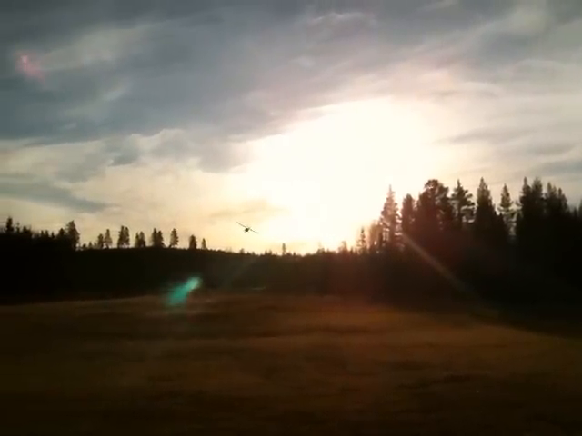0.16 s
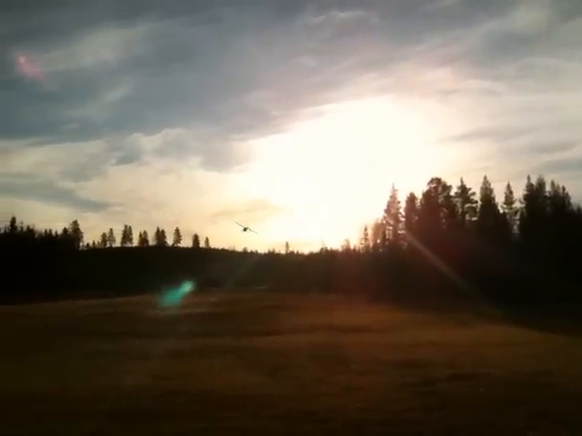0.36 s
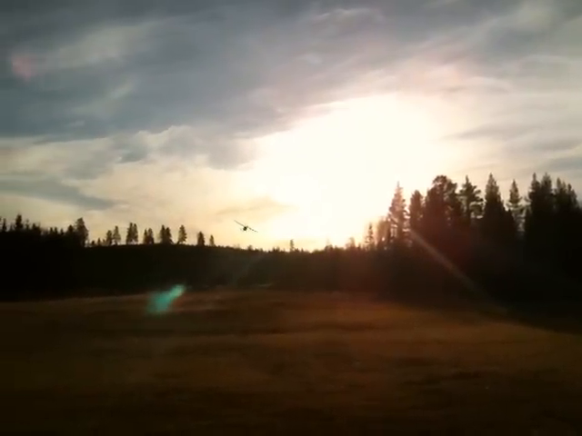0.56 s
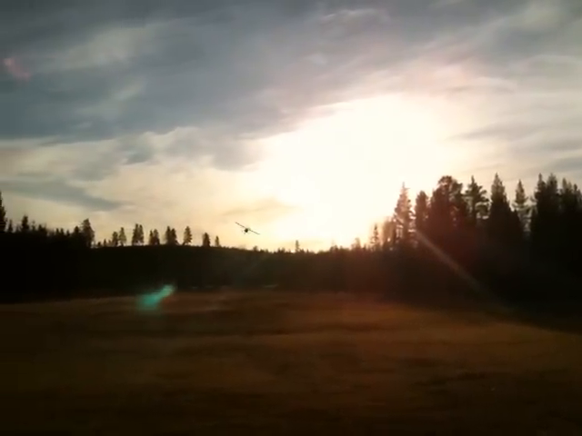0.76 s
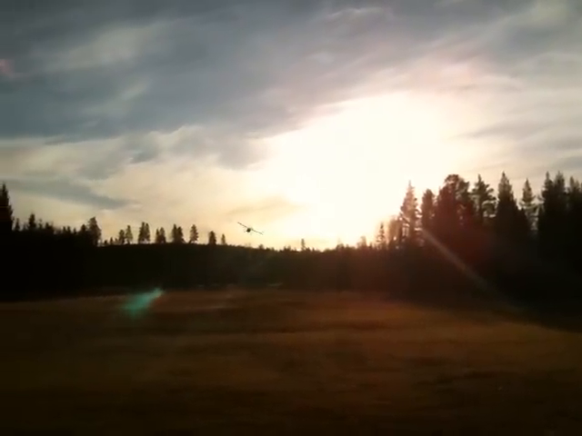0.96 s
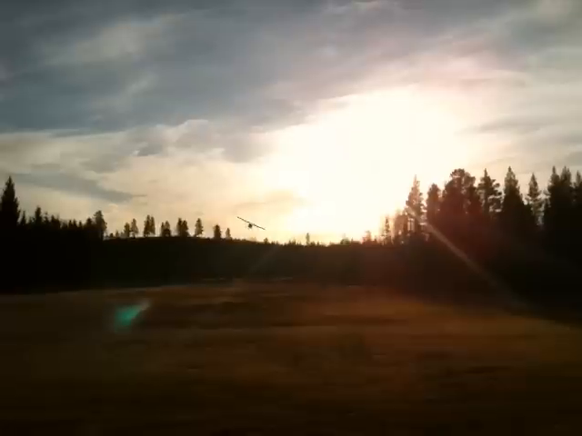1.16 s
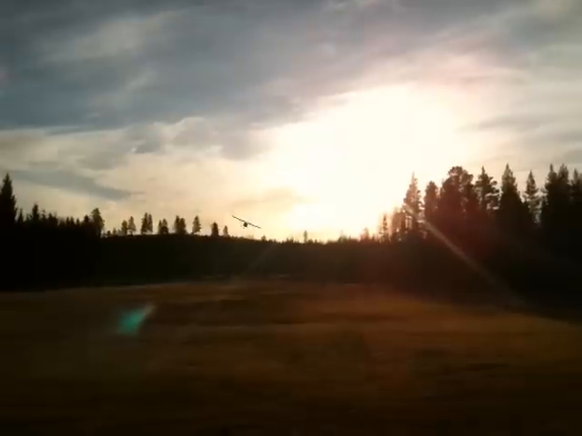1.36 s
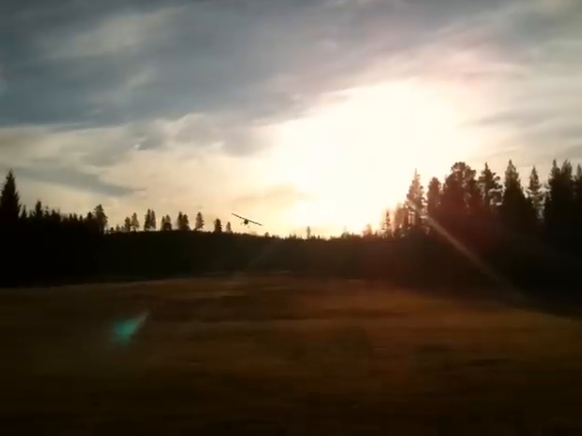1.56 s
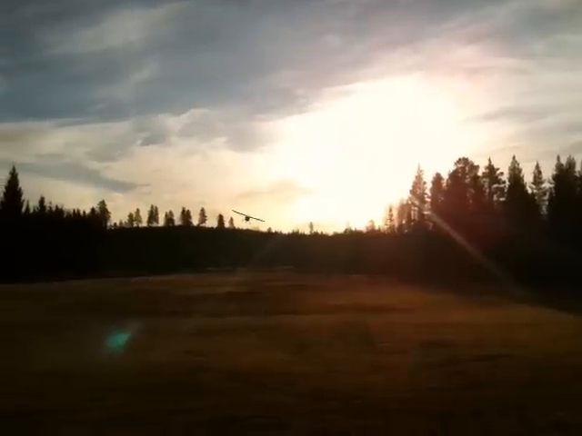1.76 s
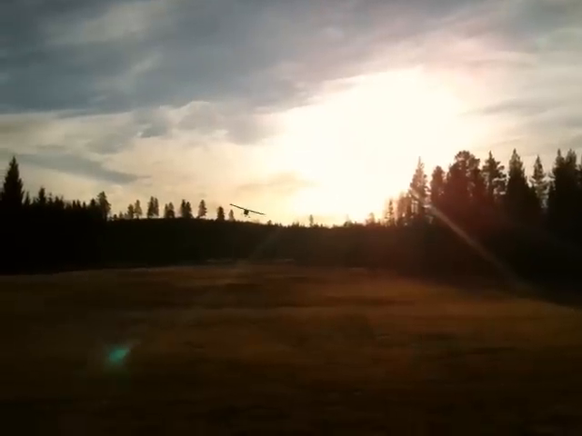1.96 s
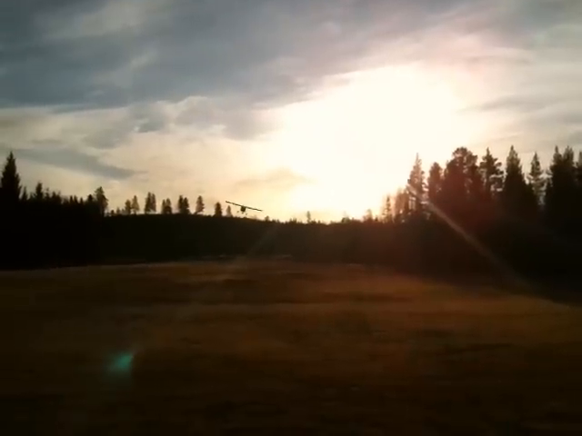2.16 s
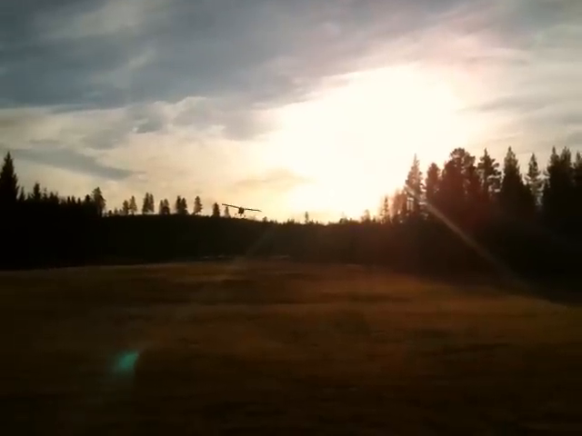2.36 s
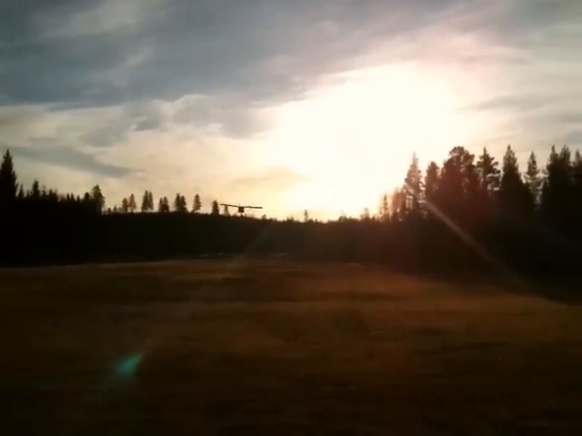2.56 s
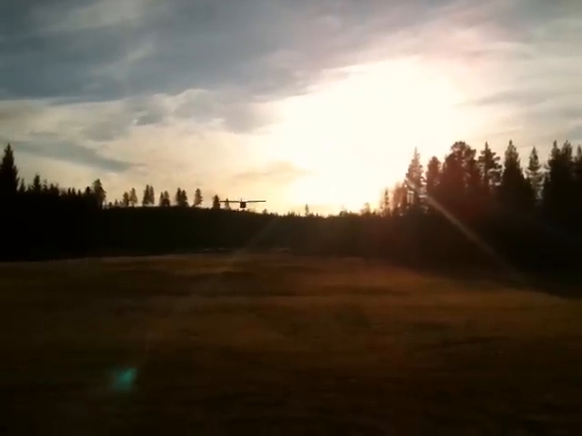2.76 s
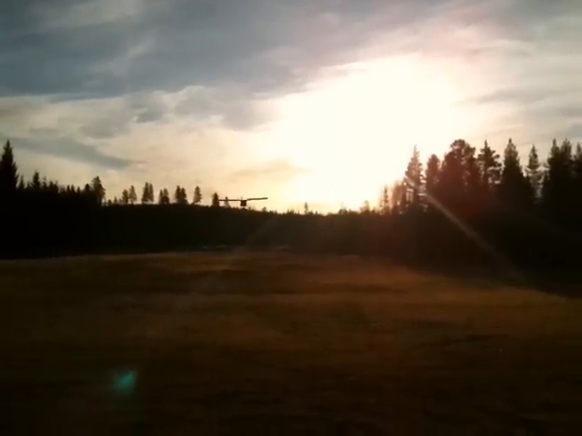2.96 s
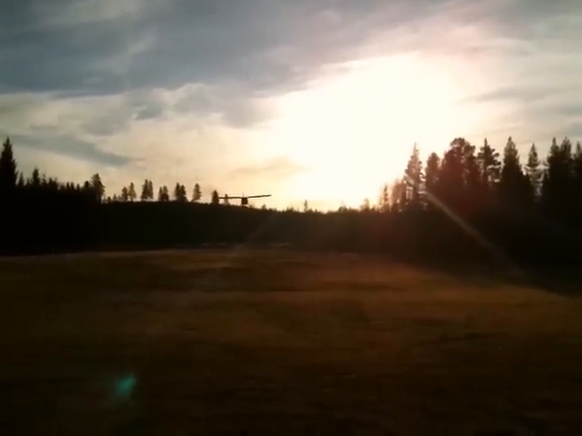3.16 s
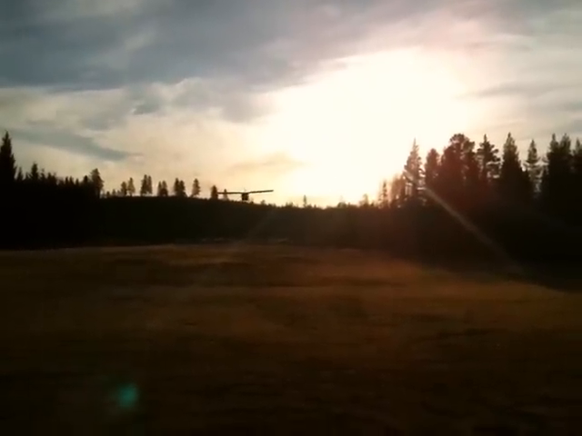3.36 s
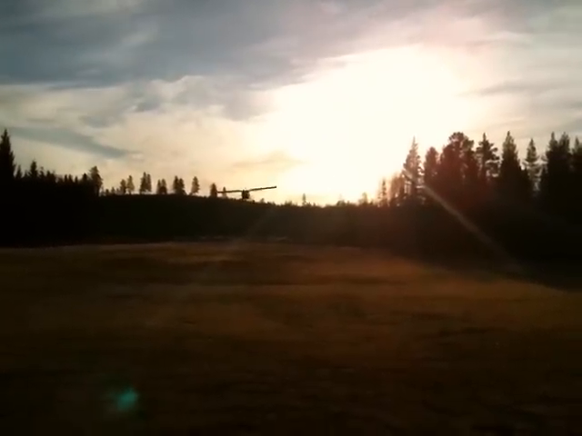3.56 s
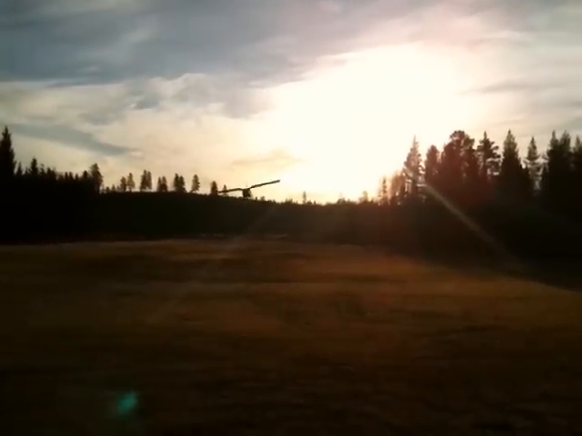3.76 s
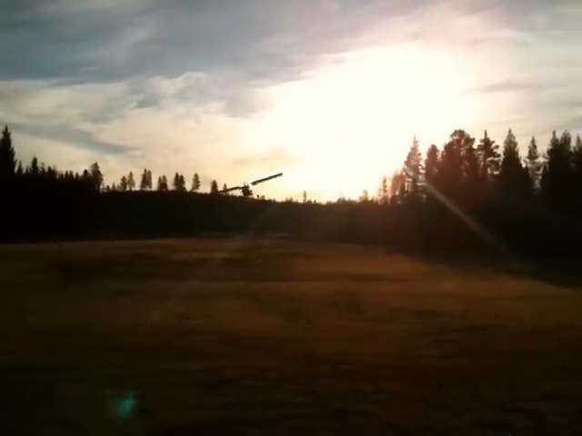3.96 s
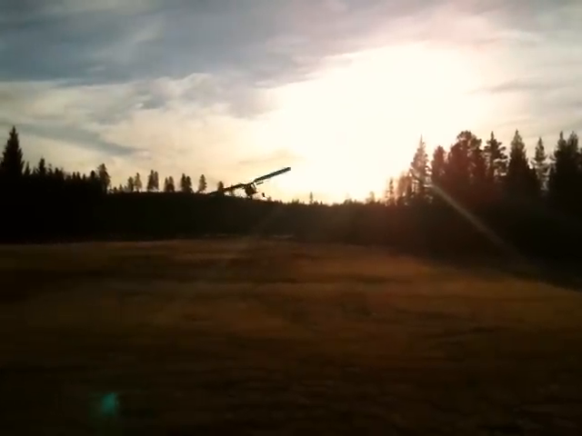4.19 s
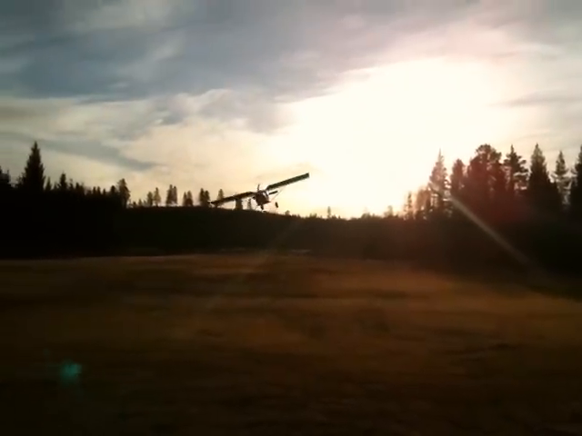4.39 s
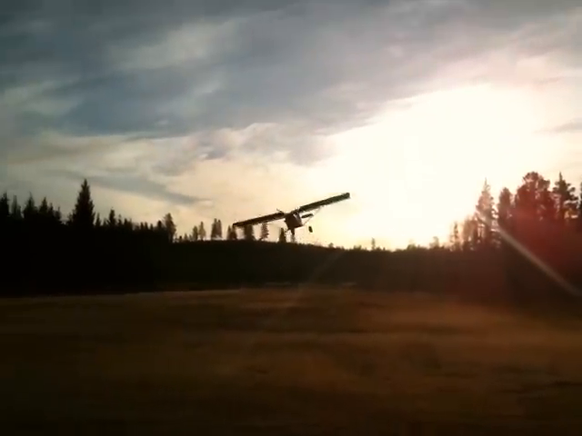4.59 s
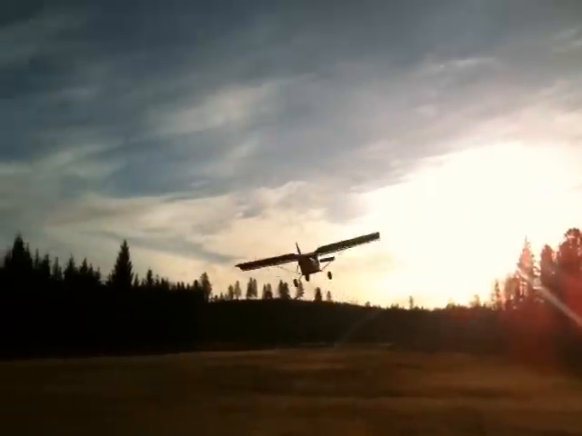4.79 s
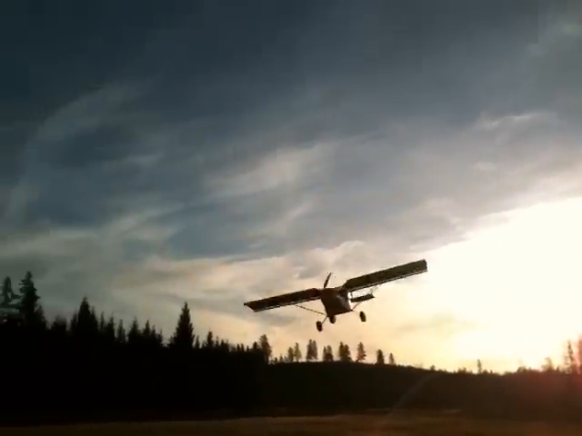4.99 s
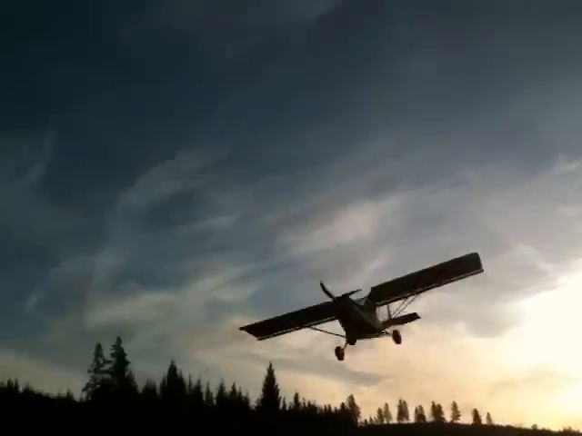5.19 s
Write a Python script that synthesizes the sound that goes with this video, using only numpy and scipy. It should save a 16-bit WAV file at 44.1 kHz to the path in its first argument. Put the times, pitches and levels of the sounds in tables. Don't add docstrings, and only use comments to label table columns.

```python
import sys
import numpy as np
from scipy import signal
from scipy.fft import rfft, irfft
from scipy.io import wavfile
from scipy.ndimage import uniform_filter1d

SR = 44100
rng = np.random.default_rng(int(sys.argv[2]) if len(sys.argv) > 2 else 0)


def ratio(d):
    e = np.asarray(d, float) / 20
    return 10 ** e


def persist_wave(psi):
    counts = np.round(np.clip(psi, -1, 1) * 32767).astype(np.int16)
    wavfile.write(sys.argv[1], SR, np.atleast_2d(counts).T)


N = 230890
T = np.arange(N) / SR
SLOW = T[::64]

# [t/s, place in the trio, 0 to 2; above or between means a blend]
STATE = [(0, 0.24), (.7, 0.22), (1.3, 0.19), (1.7, 0.19), (2.03, 0.059), (2.14, 0.65), (2.3, 0.69),
         (2.5, 0.54), (3, 0.76), (3.5, 0.88), (4, 0.97), (4.5, 1.23), (4.65, 1.3), (4.8, 1.33), (5, 1.8),
         (5.24, 1.83)]

# [t/s, cycles per s, half the crank speed]
CYCLE = [(0, 33.2), (.5, 33.3), (.8, 33.55), (1.1, 34.3), (1.5, 35.35), (1.75, 36.5), (1.97, 37.75),
         (2.14, 39.2), (2.3, 40.55), (2.45, 41.45), (2.64, 41.85), (2.8, 42), (4.3, 42), (4.9, 41.93),
         (5.24, 41.65)]
MULTIPLES = [*range(3, 26), 33, 38, 19 / 3, 38 / 3]
FIRING = [(-20, -48, -34), (-9, -5, -6), (-2.5, -28, -31), (2.5, -8.5, -10), (-5, -9, 1), (-2.5, -37, 9),
          (-21, -32, 4), (-23, -72, -16), (-17, 2, -1), (-7.5, -12.5, -16), (-8.5, -14, -3),
          (-12, -7.5, -15), (-3.5, -7, -17.5), (-3.5, -5.5, 1.5), (-9, -12, -46), (-2, -27, 9),
          (-9, -30, -1), (-40, -4.5, 0.5), (-14, -13.5, -10), (-18, -6, -9), (-1, -8, -25), (-10, -39, 7),
          (-5, -9, -8), (-1.5, -9, -32), (-1, 0, -38), (-4, -20.5, 0.5), (-38, -14.5, 3)]
RASP = range(55, 67)
SHAKE_DB, SHAKE_RAD = 0.7, 0.032
# [f/Hz, width/Hz, level/dB]
SILENCER = [(200, 55, 0.5), (478, 29, -3), (564, 42, -4.5), (624.6, 18, 4.5), (644, 30, -6),
            (894, 70, -2.5), (1340, 340, -17.5)]
# [t/s, f/Hz, level/dB, length/s]
COUGHS = [
    (2.619, 200, -35, 0.054),
    (2.783, 653, -59, 0.017),
]

SMALL_TEETH, LARGE_TEETH, BLADE_COUNT, CYLINDERS = 21, 51, 3, 4
BLADES = [(-1, -4.5, 1.5), (0.5, 7.5, 10.7), (15.5, -2, 8.7), (0, -4, 8.4)]
MESH = [(-6, -47, -4.5), (-11.5, -14.5, 0), (-10.5, -6.5, -15), (-8.5, -11, -4), (-18, -12, 1),
        (-22, -7.5, -8.5), (-28, -16, -2.5)]
OCTAVE = [(-24, -22, -28), (-17, -8, -28), (-24, -24, -28)]
# [width/Hz, trio of level/dB]
RATTLE = [(300, (-5.5, -31, -29)), (306, (-22, -7, -7)), (200, (-23, -17, -27))]
# [t/s, level/dB]
LOAD = [(0, 4), (2, -0.5), (2.6, 0), (3.1, 2.5), (3.6, 1.5), (4.0, 1), (4.3, -0.5), (4.5, -4), (4.62, 2),
        (4.72, 4), (4.9, 0.5), (5.05, -3), (5.24, -1.5)]

# [f/Hz, level/dB per Hz]
ROAR = [(40, -107), (150, -4.5), (330, -12), (480, -3.5), (930, -10), (1800, -15.5), (2600, -10.5),
        (3200, -15.5), (3800, -14.5), (4400, -15), (5000, -16), (8000, -21.5), (10000, -29.5),
        (10800, -31.5), (11500, -37), (15700, -36)]
SWELL_DB = 0.25
# [low f/Hz, high f/Hz, trio of level/dB]
TIPS = [
    (4800, 7300, (-19, -11.5, -22)),
    (10000, 15600, (-51, -47, -25)),
]
# [f/Hz, width/Hz, level/dB against the pass level]
STRUTS = [(4280, 150, -19), (4595, 200, -18.5)]
# [t/s, level/dB]
FLOW = [(0, -3), (.8, 0), (1.6, 0), (2.5, -9), (2.9, 3.5), (3.4, 1.5), (3.65, 1), (4.1, 3), (4.35, 2.5),
        (4.65, 3.5), (4.85, -6), (5.24, -21)]

SPEED_M_S, PASS_S, MISS_M, CAMERA_M, SOUND_M_S = 30, 5.5, 30, 1.37, 343
# [t/s, height above the grass/m]
HEIGHT = [(0, 28), (1, 22.5), (1.6, 19.1), (2.0, 16.1), (2.5, 12.96), (3.2, 9.62), (3.7, 7.44), (4.1, 5.85),
          (4.45, 5.37), (4.7, 5.9), (4.9, 7), (5.24, 9.6)]
PASS_DB, GRAZE_DB_PER_M = -26.5, 0.083
EXHAUST_DB, PROPELLER_DB = (-5, -5, -4.5), (-21.5, -20, -24.5)
GEAR_DB, ROAR_DB = (-11.5, -11.5, -11.5), (0.2, -0.46, 0.94)
# [t/s, half length/s, level/dB, air path gained/m]
EDDIES = [(0.952, 0.83, -3, -32), (1.44, 0.062, 1, 2), (2.142, 0.059, 1.5, 4), (1.81, 0.37, -2.5, 11),
          (2.996, 0.71, 0.6, 12.5), (3.927, 0.87, -0.08, -7.5), (4.303, 0.39, 0.35, -1.5),
          (4.697, 0.18, -0.65, 2.5), (5.15, 0.14, 0.83, -3)]
MURK = 3.76
ECHO = (0.45, 0.44, 0.16)
SHADE_DB, SHADE_HZ, SHADE_S = -2.5, 4800, (4.6, 5.1)

# [f/Hz, level/dB per Hz]
HISS = [(30, -12), (150, 23), (600, 15), (3000, 3.5), (9000, -1.5), (14000, 0), (15800, -14)]
# [f/Hz, level/dB]
WHINE = [(14971, -87), (15030, -82), (15089, -108), (15149, -99)]
# [f/Hz, limit in a quiet scene/dB, rise/dB per dB of loudness]
MASK = [(3000, -135, 1.4), (6000, -117, 1.4), (8500, -106, 1.7), (10300, -103.3, 2.0),
        (10900, -101.5, 1.95), (11200, -101, 1.8), (12600, -101, 1.8), (13500, -102, 1.85),
        (14500, -101, 1.9), (14900, -102.5, 1.35), (15150, -102.5, 1.35), (15300, -102, 1.95),
        (15800, -103, 1.85)]
# [t/s, low f/Hz, high f/Hz]
SLIPS = [(.347, 4130, 6890), (.835, 6890, 8270), (.905, 4130, 5170), (4.713, 4650, 5680),
         (4.829, 4130, 5170), (4.829, 6890, 8270)]
BLOCK_S = 2048 / SR


def exhaust(rate, turns, surge_db=0.95):
    pull = ratio(surge_db * uniform_filter1d(np.gradient(rate, SLOW), size=90))
    churn = gain((1.5, 0, 6))
    out = np.zeros(N)
    for k, db in zip(MULTIPLES, FIRING):
        level = gain(db) * silencer(k * rate)
        if k % CYLINDERS == 0:
            level = level * pull
        out += tone(k * turns, level, flutter_db=SHAKE_DB * k ** 0.4, wander=SHAKE_RAD * k * churn)
    for k in RASP:
        out += tone(k * turns, gain((-31, -28, -33)), flutter_db=7.0, wander=0.19)
    return heard(EXHAUST_DB) * out


def silencer(hz):
    return np.sqrt(sum(ratio(2 * db) / (1 + (2 * (hz - f) / width) ** 2) for f, width, db in SILENCER))


def coughs():
    out = np.zeros(N)
    for s, hz, db, length in COUGHS:
        progress = np.clip((T - s) / length, 0, 1)
        swell = np.sin(np.pi * progress ** 0.45) ** 2
        out += ratio(db) * swell * np.sin(2 * np.pi * hz * T)
    return out


def roar(turns):
    throb = 1 + 0.035 * np.cos(2 * np.pi * turns) + 0.12 * np.cos(2 * np.pi * CYLINDERS * turns)
    swell = fine(ratio(-1.5 + SWELL_DB * drift(top_hz=9)))
    return heard(ROAR_DB) * swell * throb * (coloured(ROAR, patchy_db=0.94) + gusts())


def gusts(swing_db=3.0):
    out = np.zeros(N)
    for low_hz, high_hz, dbs in TIPS:
        band = signal.butter(N=2, Wn=[low_hz, high_hz], btype="band", fs=SR, output="sos")
        level = gain(dbs) * ratio(swing_db * drift(top_hz=30.57))
        out += fine(level) * evened(signal.sosfilt(band, rng.standard_normal(N)))
    return out


def gearbox(shaft):
    out = np.zeros(N)
    first = LARGE_TEETH - len(MESH) // 2
    for k, db in enumerate(MESH):
        out += tone((first + k) * shaft, gain(db), flutter_db=2.5, wander=0.72)
    for k, db in enumerate(OCTAVE):
        out += tone((2 * LARGE_TEETH + k - 1) * shaft, gain(db), flutter_db=2, wander=0.5)
    for k, (width_hz, db) in enumerate(RATTLE):
        out += fine(gain(db)) * fuzzy((k + 1) * LARGE_TEETH * shaft, width_hz)
    return heard(GEAR_DB) * fine(ratio(curve(LOAD, 1))) * out


def propeller(shaft):
    out = np.zeros(N)
    for k, db in enumerate(BLADES):
        out += tone((k + 1) * BLADE_COUNT * shaft, gain(db), flutter_db=1.2, wander=0.06)
    return heard(PROPELLER_DB) * out


def struts():
    out = np.zeros(N)
    for hz, width_hz, db in STRUTS:
        out += ratio(db) * fuzzy(hz * T, width_hz)
    return heard((0, 0, 0)) * fine(ratio(curve(FLOW, 1))) * out


def meadow(x, air_db=0.1234, steepness=1.875, lag_turns=0.6, soft_hz=800, blur_turns=3.3):
    hz, t, z = signal.stft(x, SR, nperseg=1024, noverlap=768)
    hz = hz[:, None]
    path_m = np.maximum(distance(t) - MISS_M + eddies(t, column=3), 0)
    loss_db = air_db * (hz / 1000) ** steepness * MURK * path_m / 100
    air = ratio(-loss_db + eddies(t, column=2))
    shade_db = np.interp(t, SHADE_S, (0, SHADE_DB))
    shade_db = shade_db / (1 + (SHADE_HZ / (hz + 1)) ** 8) / (1 + (hz / SHADE_HZ / 2) ** 8)
    air *= ratio(shade_db)
    delay_s = 2 * curve(HEIGHT, 1, t) * CAMERA_M / distance(t) / SOUND_M_S
    strength = np.clip(np.interp(curve(STATE, 1, t), range(3), ECHO), 0, 1)
    strength = strength / (1 + (hz * delay_s / blur_turns) ** 4)
    strength += (1 - strength) * 0.28 / (1 + (hz / 600) ** 2)
    lag = hz * delay_s + lag_turns * hz / (hz + soft_hz)
    arrived = z * air * (1 + strength * np.exp(-2j * np.pi * lag)) / 1.252
    return signal.istft(arrived, SR, nperseg=1024, noverlap=768)[1][:N]


def distance(t):
    return np.hypot(SPEED_M_S * (PASS_S - t), MISS_M)


def heard(dbs):
    far = distance(SLOW)
    graze = ratio(PASS_DB - GRAZE_DB_PER_M * (far - MISS_M))
    return fine(gain(dbs) * graze * MISS_M / far)


def eddies(t, column):
    return sum(row[column] * np.exp(-((t - row[0]) / row[1]) ** 2) for row in EDDIES)


def camera():
    whine = sum(tone(hz * T, ratio(db), flutter_db=0.0, wander=0.48) for hz, db in WHINE)
    return ratio(-64.5) * coloured(HISS, patchy_db=0.2) + whine


def thinned(x):
    hz, t, z = signal.stft(x, SR, window="cosine", nperseg=2048, noverlap=1024)
    loud_db = 10 * np.log10(uniform_filter1d(2 * (abs(z) ** 2).sum(0), size=15) + 1e-12)
    over_db = 2 * np.logaddexp(0, (loud_db + 40) / 2)
    chance = rng.standard_normal(z.shape[::-1]).T
    jitter_db = 2.6 * evened(uniform_filter1d(chance, size=14, axis=0))
    f, quiet_db, rise = np.transpose(MASK)
    limit_db = np.interp(hz, f, quiet_db)[:, None] + np.outer(np.interp(hz, f, rise), over_db)
    kept = abs(z) > ratio(limit_db + jitter_db)
    return signal.istft(z * kept, SR, window="cosine", nperseg=2048, noverlap=1024)[1][:N]


def slips(x, share_db=-3):
    out, t = np.zeros(N), np.arange(round(BLOCK_S * SR))
    hz = np.fft.rfftfreq(len(t), 1 / SR)
    fade = np.sin(np.pi * t / len(t)) ** 2
    for s, low_hz, high_hz in SLIPS:
        inside = (hz > low_hz) & (hz < high_hz)
        at = round((s - BLOCK_S / 2) * SR) + t
        level = np.std(irfft(rfft(x[at]) * inside))
        noise = evened(irfft(rfft(rng.standard_normal(len(t))) * inside))
        out[at] += ratio(share_db) * level * fade * noise
    return out


def tone(turns, level, flutter_db, wander):
    height = np.sqrt(2) * level * ratio(flutter_db * drift(top_hz=14))
    return fine(height) * np.sin(2 * np.pi * (turns + rng.random()) + fine(wander * drift(top_hz=9)))


def fuzzy(turns, width_hz):
    low = signal.butter(N=2, Wn=width_hz / 2, fs=SR, output="sos")
    return evened(signal.sosfilt(low, rng.standard_normal(N)) * np.cos(2 * np.pi * turns))


def coloured(points, patchy_db):
    hz = np.fft.rfftfreq(1024, 1 / SR)
    a, b, patches = rng.standard_normal((N // 256 + 5, 513, 3)).T
    patches = uniform_filter1d(patches, size=14, axis=0)
    patches = evened(uniform_filter1d(patches, size=14, axis=1))
    f, db = np.transpose(points)
    shape_db = np.interp(np.log(hz + 1), np.log(f), db)[:, None]
    z = (a + 1j * b) * ratio(shape_db + patchy_db * patches)
    return evened(signal.istft(z, nperseg=1024, noverlap=768)[1][:N])


def drift(top_hz):
    f = np.geomspace(0.0498 * top_hz, top_hz, num=12)[:, None]
    return evened(np.sin(2 * np.pi * (f * SLOW + rng.random((12, 1)))).sum(0))


def gain(dbs):
    return ratio(np.interp(curve(STATE, 1), range(3), dbs))


def curve(rows, column, t=SLOW):
    rows = np.asarray(rows)
    return np.interp(t, rows[:, 0], rows[:, column])


def fine(control):
    return np.interp(T, SLOW, control)


def evened(x):
    return x / np.sqrt(np.mean(x ** 2) + 1e-20)


def scene():
    rate = uniform_filter1d(curve(CYCLE, 1), size=60)
    turns = np.cumsum(fine(rate)) / SR
    shaft = turns * 2 * SMALL_TEETH / LARGE_TEETH
    plane = exhaust(rate, turns) + coughs() + roar(turns) + gearbox(shaft) + propeller(shaft) + struts()
    cut = signal.butter(N=4, Wn=75, btype="high", fs=SR, output="sos")
    return np.tile(signal.sosfilt(cut, meadow(plane)) + camera(), (2, 1))


def top_cut(x):
    return signal.sosfilt(signal.butter(12, 15780, fs=SR, output="sos"), x)


def record(dry):
    mono = thinned(dry[0])
    mix = mono + np.outer([1, -1], slips(mono))
    return top_cut(mix)


dry = scene()
out = record(dry)
persist_wave(out)
```